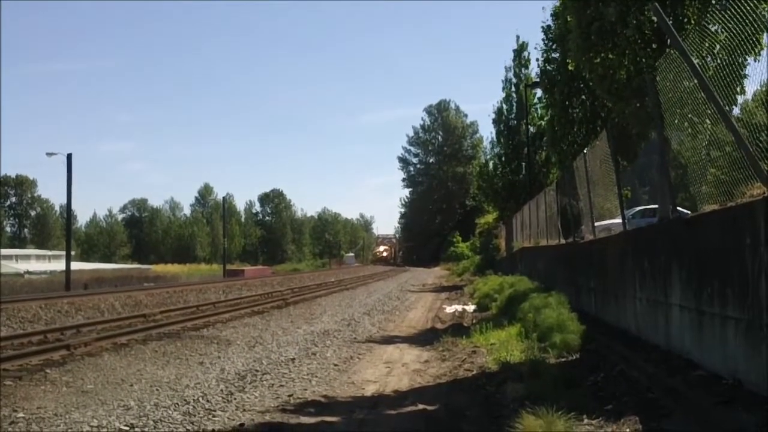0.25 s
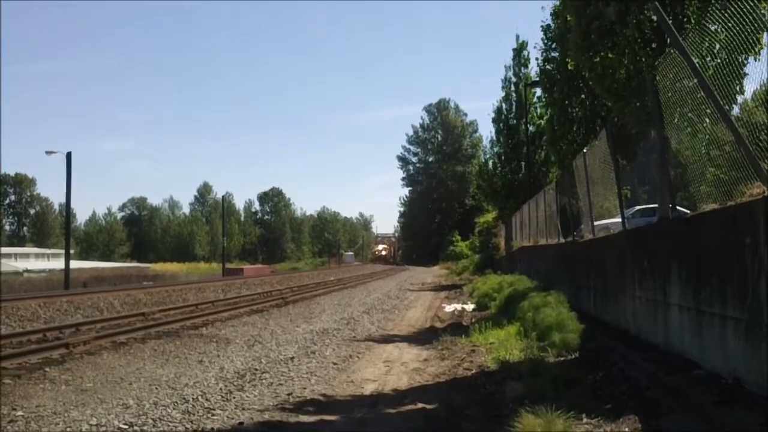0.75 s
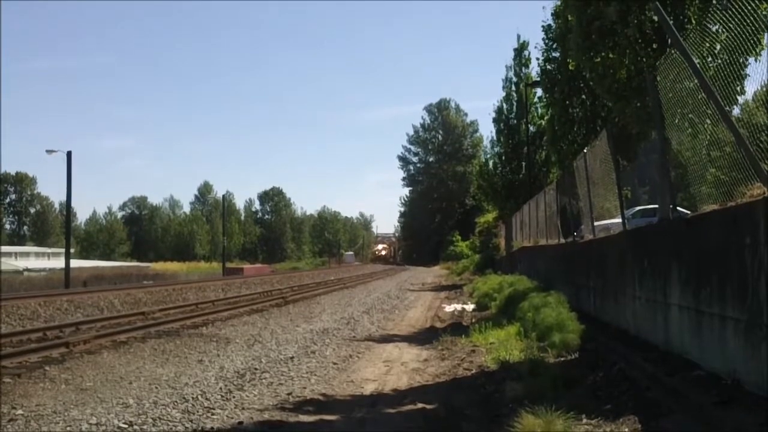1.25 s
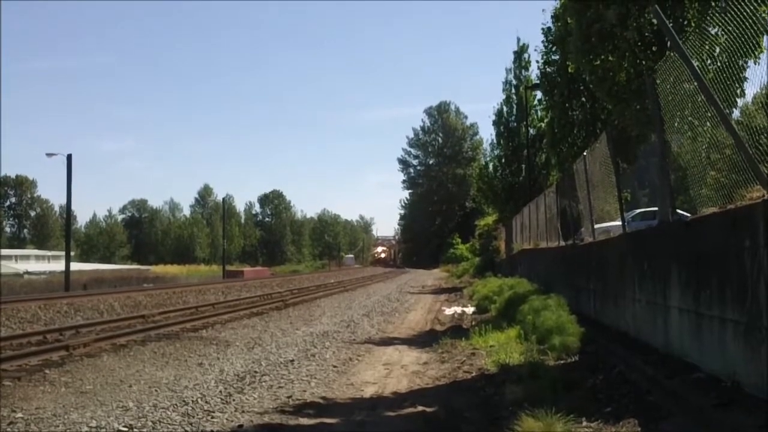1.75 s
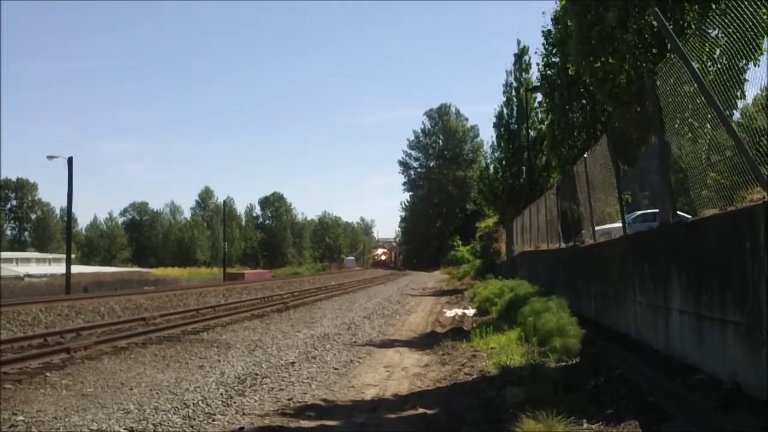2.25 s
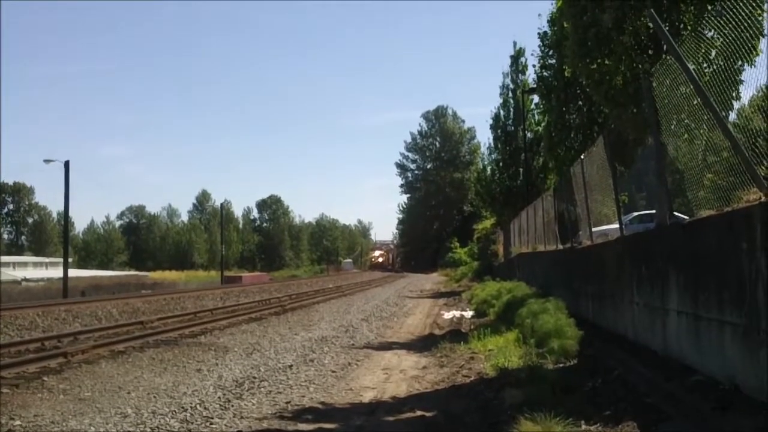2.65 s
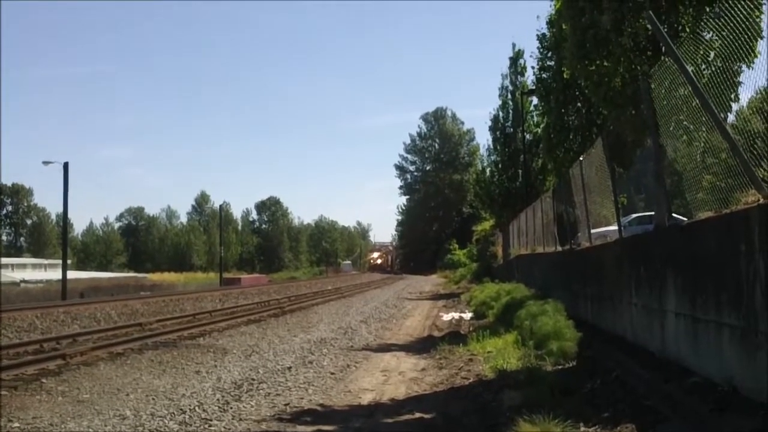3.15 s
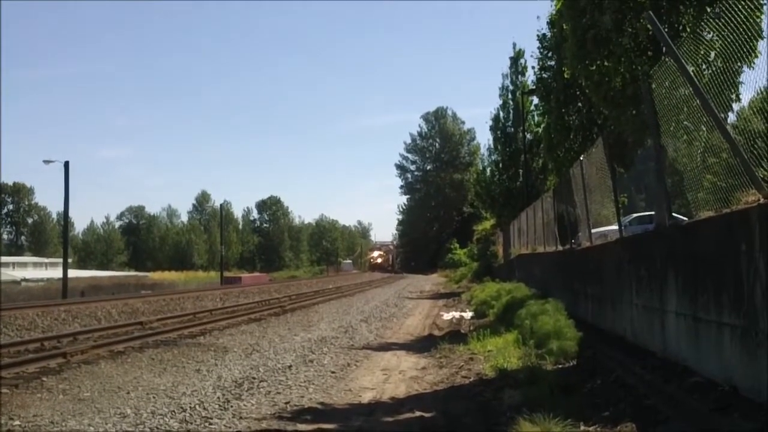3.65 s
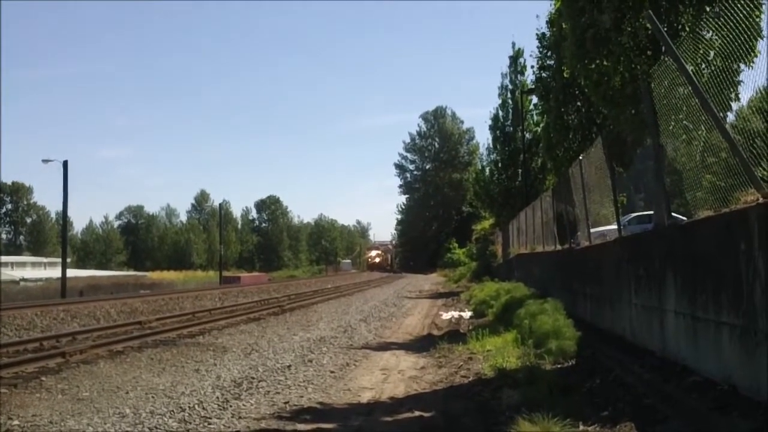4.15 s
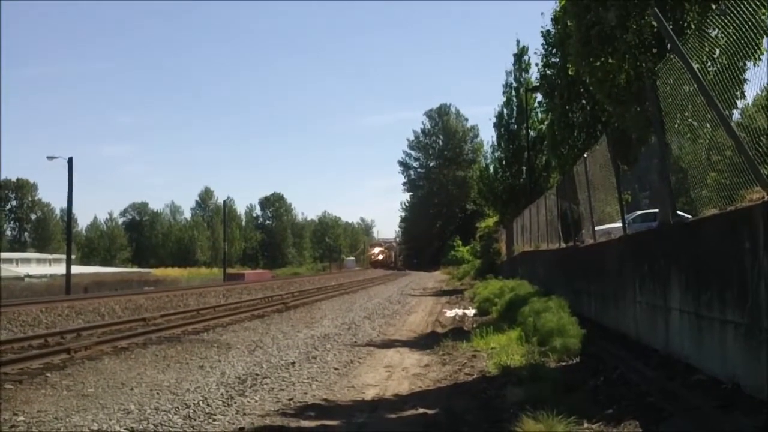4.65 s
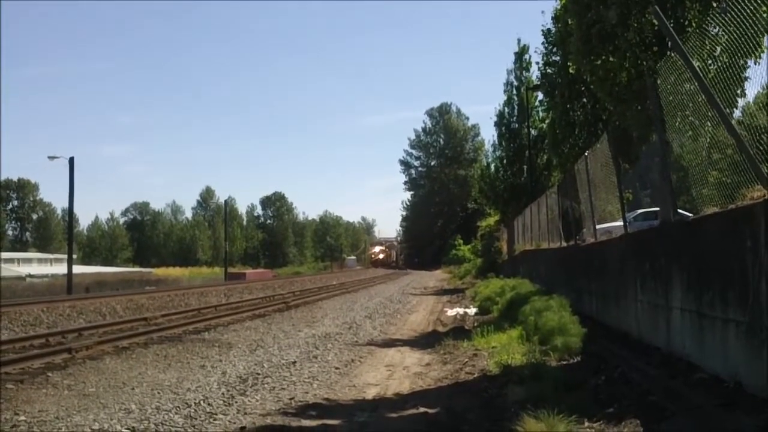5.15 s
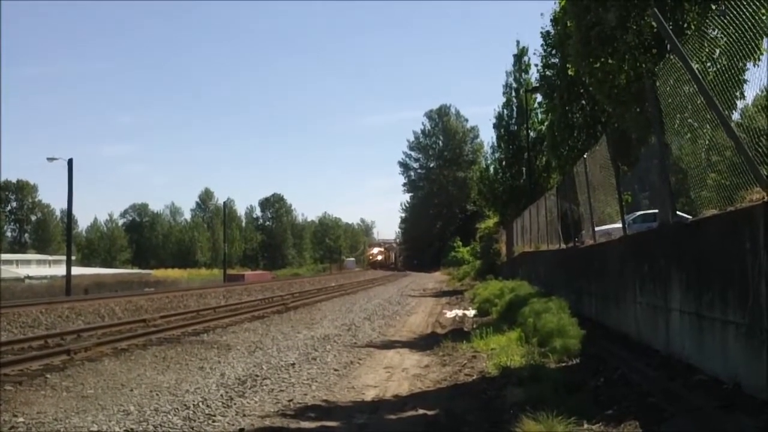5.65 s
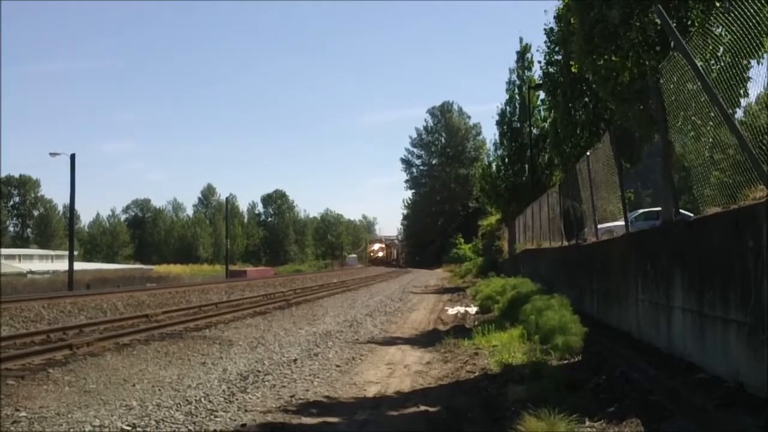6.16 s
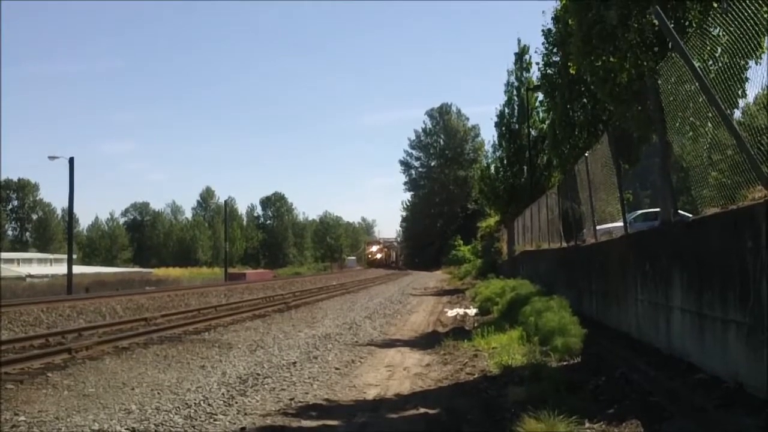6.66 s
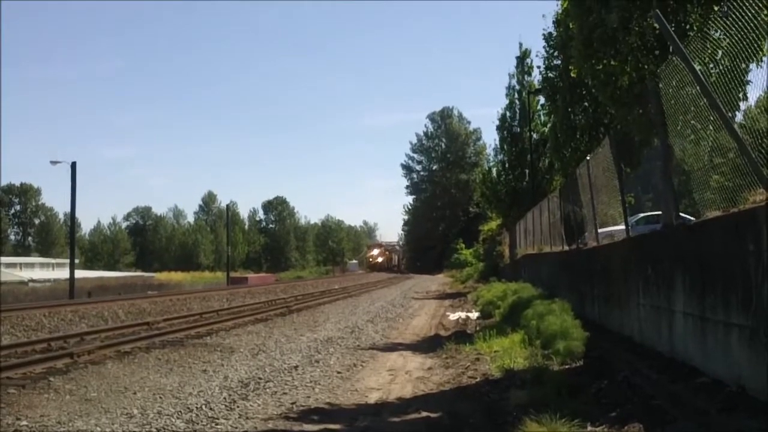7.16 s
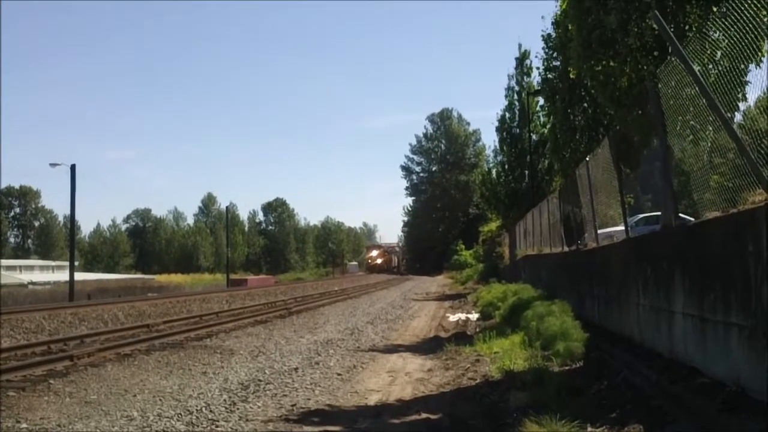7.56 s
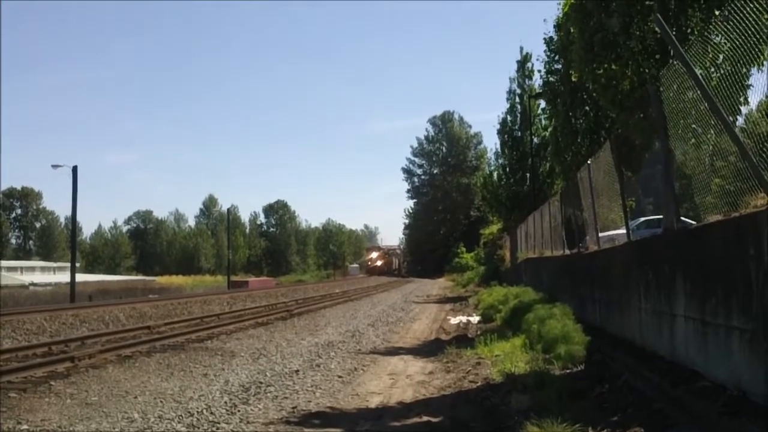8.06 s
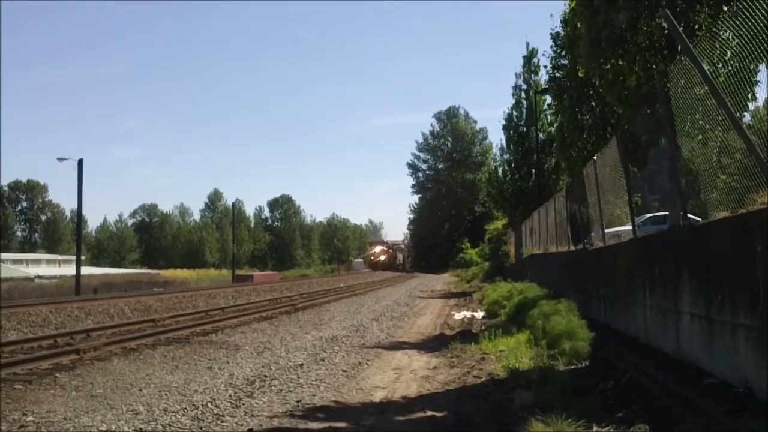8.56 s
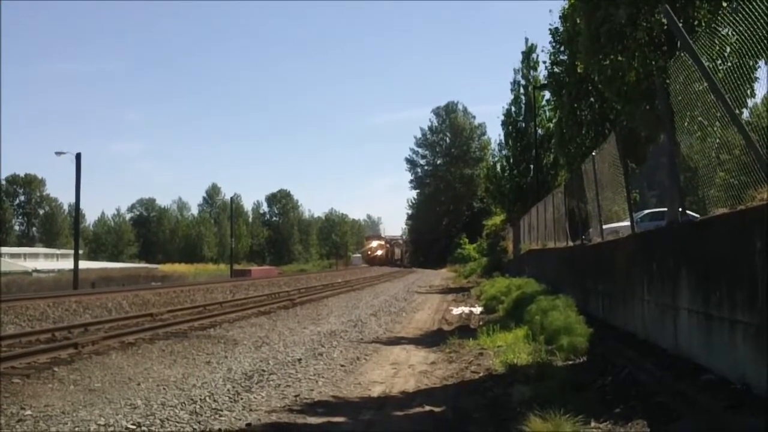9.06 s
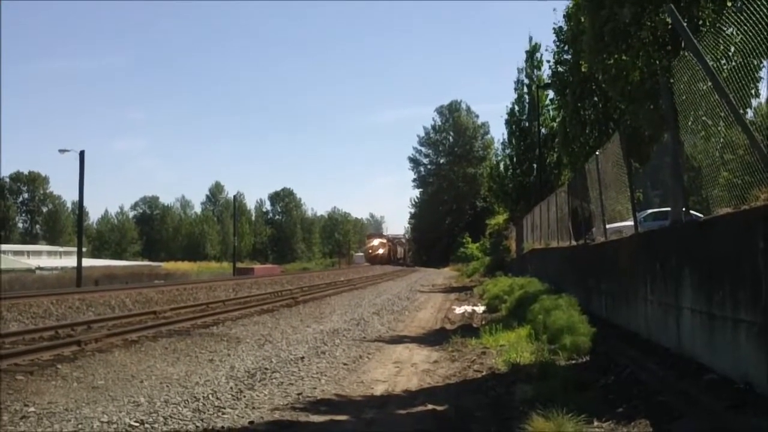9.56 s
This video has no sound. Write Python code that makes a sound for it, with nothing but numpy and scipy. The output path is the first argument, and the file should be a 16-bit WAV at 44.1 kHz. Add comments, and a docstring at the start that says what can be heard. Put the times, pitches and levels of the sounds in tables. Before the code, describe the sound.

Open trackside, train still far down the line. A deep, throbbing diesel drone climbs slowly in pitch and swells, dipping briefly near the start. A second engine hums underneath. Rushing wheel hiss grows, with thin turbo whistle midway, faint metallic ringing and sizzling rail rub later. One tiny distant chirp and soft low wind bumps strike the stereo microphone, which adds faint high electronic whine. The train never passes.

```python
"""A throbbing drone and rushing noise slowly build: a diesel freight train works up speed towards the listener.
The leading two-stroke engine is a sum of crank-order tones that rise with its revs; geared whines climb with them.
A second engine is a swept firing tone with a thin, fluttering turbocharger whistle.
Exhaust rumble, wheel roar, hiss, rail rub and wind are coloured noise; the running gear rings as blurred tones.
One short chirp sounds far off; the microphone's electronics add steady faint whines and hiss."""
import sys
import numpy as np
from scipy import signal
from scipy.fft import rfft, irfft, next_fast_len
from scipy.io import wavfile

SR = 44100
rng = np.random.default_rng(int(sys.argv[2]) if len(sys.argv) > 2 else 0)


def materialize(psi):
    """Save the field psi as 16-bit PCM at rate SR to the path in sys.argv[1].

    A 1-D psi becomes a single channel; in a 2-D psi each row is a channel.
    """
    bounded = np.clip(np.atleast_2d(psi).T, -1, 1)
    quanta = np.round(bounded * 32767).astype(np.int16)
    wavfile.write(sys.argv[1], SR, quanta)


N = 433062

# strength of each cylinder's puff in firing order: level [dB]
CYLINDERS = [0, 0, 2, .3, 0, -2.5, 0, 2, 0, -.3, 1.7, 0]
# rushing hiss: (time [s], level [dB])
HISS_LEVEL = [(0, -61.5), (.55, -58), (2, -58), (3.5, -55), (5.3, -49.5), (5.95, -48.5), (6.25, -50.5),
              (7.3, -49.5), (8.5, -47), (9.3, -50)]


def from_db(db):
    """Decibels to amplitude gain."""
    return 10 ** (np.asarray(db) / 20)


def rms_one(x):
    """Scale to rms 1."""
    return x / np.sqrt(np.mean(x ** 2) + 1e-20)


def seconds():
    """Time of every sample."""
    return np.arange(N) / SR


def in_time(rows):
    """Interpolate a two-column time curve to every sample."""
    time_s, value = np.transpose(rows)
    return np.interp(seconds(), time_s, value)


def at_hz(points, hz):
    """Read a spectrum on a log-frequency axis."""
    point_hz, value = np.transpose(points)
    return np.interp(np.log(np.maximum(hz, 1)), np.log(point_hz), value)


def angle_of(hz):
    """Running angle [rad]: the integral of a rate in cycles per second."""
    return 2 * np.pi * np.cumsum(hz) / SR


def drift(corner_hz):
    """Slow random signal of rms 1: noise at SR / 40 through two equal one-pole low-passes."""
    step, warm_up = 40, 2000
    pole = np.exp(-2 * np.pi * corner_hz * step / SR)
    noise = rng.standard_normal(N // step + warm_up + 2)
    slow = signal.lfilter([1], [1, -2 * pole, pole * pole], noise)[warm_up:]
    return np.interp(np.arange(N) / step, np.arange(len(slow)), rms_one(slow))


def narrow_noise(angle, width_hz):
    """Tone blurred to narrow noise of about rms 1: two slow random signals on its cosine and sine."""
    return drift(width_hz) * np.cos(angle) + drift(width_hz) * np.sin(angle)


def scattered(angle, width_hz):
    """Blurred tone: a direct part wandering in pitch plus independent narrow noise in each ear."""
    direct = np.sqrt(2) * np.cos(angle + angle_of(width_hz / 2 * drift(width_hz)))
    diffuse = np.array([narrow_noise(angle, width_hz) for ear in range(2)])
    return (direct + diffuse) / np.sqrt(2)


def panned(x, left_db):
    """Pan by the level of the left ear over the right."""
    return x * from_db(np.array([[1], [-1]]) * left_db / 2)


def air_noise(spectrum, left_db):
    """Coloured stereo noise: a mid of rms 1 plus a side that sets the likeness of the ears per band."""
    # (frequency [Hz], left-right likeness [0-1])
    likeness = [(20, .8), (60, 0.63), (150, 0.66), (290, 0.82), (630, .42), (1300, 0.47), (2000, 0.8),
                (4000, 0.94), (7000, 1), (14000, .6)]
    size = next_fast_len(N)
    hz = np.arange(size // 2 + 1) * SR / size
    alike = np.clip(at_hz(likeness, hz), 0, .99)
    mid, side = rfft(rng.standard_normal((2, size))) * from_db(at_hz(spectrum, hz))
    side = side * np.sqrt((1 - alike) / (1 + alike))
    mid, side = irfft([mid, side], size)[:, :N]
    return panned((mid + side * [[1], [-1]]) / np.std(mid), left_db)


def swell(centre_s, length_s):
    """Gaussian bell of height 1; length is its full width at 1/e."""
    return np.exp(-np.minimum(np.square(2 * (seconds() - centre_s) / length_s), 50))


def swells(rows, base_db):
    """Base gain plus one bell per row (time, length, level)."""
    return from_db(base_db) + sum(from_db(db) * swell(centre_s, length_s) for centre_s, length_s, db in rows)


def held(start_s, end_s, fade_s):
    """Gain that ramps up, holds and ramps down."""
    t = seconds()
    return np.clip(np.minimum(t - start_s, end_s - t) / fade_s, 0, 1)


def approach_db():
    """1 / distance gain over that at the start, for a train closing in at constant speed."""
    start_m, speed_m_per_s = 293, 13.1
    distance_m = np.maximum(start_m - speed_m_per_s * seconds(), 1)
    return 20 * np.log10(start_m / distance_m)


def crank_speed():
    """The leading engine revs up almost evenly."""
    # (time [s], crank speed [turns/s])
    crank_curve = [(0, 5.015), (0.8, 5.145), (1.5, 5.314), (4, 5.77), (9.82, 6.78)]
    return in_time(crank_curve)


def puff_timing(order, places, puff_db):
    """Phase [rad] of one crank order in a train of unequal puffs at given places in the turn."""
    return np.angle(np.sum(from_db(puff_db) * np.exp(-2j * np.pi * order * places)))


def cylinder_timing(order):
    """Phase of one crank order when all twelve cylinders add."""
    return puff_timing(order, np.arange(len(CYLINDERS)) / len(CYLINDERS), CYLINDERS)


def engine_line(angle, echo, smear_rad):
    """Engine partial, rms 1 before its echoes, phase-blurred by the long way it travels."""
    # ground and wall delay each pitch by its own amount
    angle = angle + smear_rad * (rng.uniform(-1, 1) + drift(1) / 6)
    direct, delayed = np.sin(angle), np.cos(angle)
    # shifting echoes reach the two ears differently
    side = echo * (drift(1) * direct + drift(0.86) * delayed)
    return np.sqrt(2) * direct + side * [[1], [-1]]


def exhaust_boom(crank, near_db):
    """Twelve firings a turn give the main note; orders 6 and 15 sound with it as a fast throb."""
    # main note before the fade: (time [s], level [dB])
    main_note = [(0.9, -26.5), (3, -22.5), (4.2, -22), (4.9, -16), (5.8, -13.5), (6.8, -18.5), (7.4, -17),
                 (9.82, -17.5)]
    # high note before the fade: (time [s], level [dB])
    high_note = [(0, -22.5), (3, -23), (4.3, -26), (5.3, -22), (6.2, -25.5), (7.5, -24), (8.6, -22),
                 (9.82, -25)]
    # the wall's echo makes the main note wander between the ears: (time [s], left over right [dB])
    boom_sway = [(2.4, 0), (3.25, 7), (4.35, -5.5), (5.5, 4), (6.5, 2.5), (7, -3.5), (7.8, 1.6),
                 (8.45, -2.5), (9.82, -0.5)]
    low_order, main_order, high_order = 6, 12, 15
    low_start_db, low_per_near_db = -41.5, 2.1  # low note grows faster than 1 / distance

    # main and high notes fade once, briefly
    fade = swell(centre_s=1.8, length_s=0.93)
    low_db = low_start_db + low_per_near_db * near_db
    main_db = in_time(main_note) - 26 * fade
    high_db = in_time(high_note) - 10.4 * fade

    # the high note bends slightly sharp, which hurries the throb
    bend_hz = .13 * swell(centre_s=6.9, length_s=2.2)

    def note(order, db, bend=0):
        angle = order * crank + bend + cylinder_timing(order)
        return from_db(db) * engine_line(angle, echo=.09, smear_rad=.15)

    low = note(low_order, low_db)
    main = note(main_order, main_db)
    high = note(high_order, high_db, angle_of(bend_hz))
    return panned(low + high, left_db=2.0) + panned(main, in_time(boom_sway))


def exhaust_chug(crank, speed):
    """Weaker orders sweep the stack's resonances, phased to pile up into the loudest cylinders' puffs."""
    # orders added by unequal cylinders: (crank order, relative level [dB])
    uneven = [(9, 2), (11, -9), (13, -1), (14, 0), (16, -1), (17, 1), (18, 8), (19, -4), (20, 3), (21, 6),
              (22, -3), (23, 1), (24, 3), (25, 2), (26, 4), (27, 4), (28, 1), (29, -9), (30, -1), (31, -2),
              (32, 2), (33, 7), (34, 6), (35, -3), (36, 7), (37, 2), (38, -3), (39, 6), (40, 1), (41, 3),
              (42, 2), (43, 0), (44, 0), (45, 3), (46, 2), (47, -1), (48, 0), (49, -1), (50, 1), (51, 1),
              (52, 4), (53, -2), (54, -1), (55, 0), (56, -6), (57, -4), (58, 1), (59, 1), (61, -1), (63, 0),
              (64, 1)]
    # response of exhaust stack and ground: (frequency [Hz], gain [dB])
    stack = [(46, -54), (60, -38), (72, -23.5), (88, -35.5), (110, -47), (130, -42), (165, -45),
             (198, -45.5), (222, -60), (250, -64.5), (335, -66.5), (400, -77.5)]
    # cylinders that bark: (place in firing order, early level [dB], late level [dB])
    loud_puffs = [(2, 0, -8), (4, -6, -6), (5, -2, 0), (7, -3, -9), (10, -6, -9)]
    # distance smears higher orders more: (crank order, smear [rad])
    order_smear = [(14, 1.4), (24, 2.4)]
    # chug strength: (time [s], gain [dB])
    chug_gain = [(0, -9), (2.5, -2.5), (5.2, 0), (9.82, 2.5)]
    first_puff_turn = .016  # fraction of a turn
    pattern_shift_s = 6.3, 8.3  # early puff pattern gives way to late

    cylinder, early_db, late_db = np.transpose(loud_puffs)
    places = first_puff_turn + cylinder / len(CYLINDERS)
    out = 0
    for order, db in uneven:
        timings = np.unwrap([puff_timing(order, places, puff_db) for puff_db in (early_db, late_db)])
        timing = np.interp(seconds(), pattern_shift_s, timings)
        smear_rad = np.interp(order, *np.transpose(order_smear))
        line = engine_line(order * crank + timing, echo=.15, smear_rad=smear_rad)
        out = out + from_db(db + at_hz(stack, order * speed)) * line
    return from_db(in_time(chug_gain)) * out


def gears(crank):
    """Fans and gears geared to the crank: blurred whines that climb with it."""
    # (crank order, width [Hz], level before the common gain [dB])
    gear_lines = [(78, 8, -65), (101, 5, -63), (141.5, 9, -59), (283, 30, -64)]
    # common gain: (time [s], gain [dB])
    gear_gain = [(0, -11), (2.6, -3.5), (3.1, -7), (3.6, -2.5), (4.3, -4), (6.5, -5.5), (7.6, -5.5),
                 (8.6, 6.5), (9.15, 0), (9.8, -2)]
    whines = sum(from_db(db) * scattered(order * crank, width_hz) for order, width_hz, db in gear_lines)
    return from_db(in_time(gear_gain)) * whines


def second_engine(waver_db, turbo_flutter_db):
    """Low firing note on an S-curve between throttle notches, plus a fluttering turbocharger whistle."""
    # firing note before its waver: (time [s], level [dB])
    firing_level = [(0.8, -24), (1.5, -31.5), (2.5, -23.5), (3.5, -34.5), (4.7, -26), (5.6, -28.5),
                    (7.4, -35.5), (8.7, -25)]
    # turbocharger spooling up: (time [s], pitch [Hz])
    turbo_pitch = [(3.5, 4180), (3.87, 4305), (4.18, 4395), (4.7, 4480), (5, 4522), (5.45, 4562),
                   (6.7, 4655), (9.3, 4685)]
    # whistle flares, added to the resting level: (start [s], end [s], level [dB])
    turbo_flares = [(3.81, 3.91, -68), (3.99, 4.07, -65), (4.09, 4.23, -65), (4.59, 4.74, -61),
                    (4.94, 5.1, -62), (5.18, 5.36, -56), (5.37, 5.5, -62), (9.15, 9.8, -69)]
    turbo_rest_db = -81
    notch_from_hz, notch_to_hz, notch_middle_s, notch_ease_s = 49.7, 66.133, 3.096, .988

    revved = 1 / (1 + np.exp((notch_middle_s - seconds()) / notch_ease_s))
    firing = angle_of(notch_from_hz + (notch_to_hz - notch_from_hz) * revved)
    drone = from_db(in_time(firing_level) + waver_db * drift(7.4)) * np.sin(firing)

    flares = sum(from_db(db) * held(start_s, end_s, fade_s=.025) for start_s, end_s, db in turbo_flares)
    turbo_gain = (from_db(turbo_rest_db) + flares) * from_db(turbo_flutter_db * drift(13))
    whistle = turbo_gain * np.sin(angle_of(in_time(turbo_pitch)) + 0.54 * drift(30))
    return np.sqrt(2) * (drone + whistle)


def exhaust_rumble(crank, near_db, chug_depth):
    """Turbulent exhaust: low noise pulsed 4 and 12 times a turn, growing as 1 / distance."""
    # (frequency [Hz], relative density [dB])
    rumble_spectrum = [(25, -18.5), (50, 6), (72, 14), (95, 9), (120, -1.5), (160, 1), (195, 4),
                       (230, -7.5), (330, -7), (420, -15.5), (600, -49.5), (1500, -72)]
    start_db = -37.5
    clear_db = 2.4 * swell(centre_s=8.63, length_s=1.1)  # carries best for a moment
    puffs = 1 + chug_depth * (np.cos(4 * crank) + np.cos(12 * crank))
    return from_db(start_db + near_db + clear_db) * puffs * air_noise(rumble_spectrum, left_db=3.0)


def hiss_swing_db():
    """Hiss level about its mean."""
    hiss_db = in_time(HISS_LEVEL)
    return hiss_db - hiss_db.mean()


def wheel_roar(flicker_db):
    """Flickering mid-band noise of the wheels that follows a third of the hiss's swing."""
    # (frequency [Hz], relative density [dB])
    roar_spectrum = [(200, -18.5), (400, -1.5), (520, 1.5), (660, 3.5), (800, 1), (1200, -1), (1550, -5),
                     (1800, -3), (2300, -12), (3200, -11.5), (5000, -33), (9000, -57)]
    mean_db, hiss_share = -49.5, 0.33
    roar_db = mean_db + hiss_share * hiss_swing_db() + flicker_db * drift(7.6)
    return from_db(roar_db) * air_noise(roar_spectrum, left_db=0)


def rushing_hiss(crank, flicker_db):
    """Noise that swells once a turn; air swallows its top at a distance, so that swings more."""
    # (frequency [Hz], relative density [dB])
    hiss_spectrum = [(600, -30.5), (1300, 1.5), (1560, -1.5), (1780, 3.5), (2120, 2), (2400, 2.5),
                     (2750, 0.5), (3150, .5), (3550, 3.5), (4100, 0), (4700, 0.5), (5700, -7.5),
                     (7000, -13), (8000, -19.5), (9500, -36), (12000, -49.5)]
    # top band: (frequency [Hz], relative density [dB])
    top_spectrum = [(4000, -24.5), (5500, 0.5), (7000, -6), (8000, -9.5), (9500, -29.5), (12000, -44.5)]
    # swell in each crank turn: (time [s], amplitude [dB])
    hiss_pulse = [(2.5, .5), (4.6, 1.25), (7, 0.8), (9, .4)]
    top_mean_db, top_swing_ratio = -69, 1.5
    swell_db = in_time(hiss_pulse) * np.cos(crank) + flicker_db * drift(18)
    hiss = from_db(in_time(HISS_LEVEL)) * air_noise(hiss_spectrum, left_db=-.5)
    top_db = top_mean_db + top_swing_ratio * hiss_swing_db()
    top = from_db(top_db) * air_noise(top_spectrum, left_db=1)
    return from_db(swell_db) * (hiss + top)


def wheel_rub():
    """Wheels rubbing on the rails: a coloured sizzle that swells over a resting level."""
    # (frequency [Hz], relative density [dB])
    rub_spectrum = [(1200, -28.5), (1750, -7.5), (2050, 1.5), (2270, -3), (2500, 1), (2750, -7), (2970, 3),
                    (3250, -14.5), (4700, -9), (5700, -13), (6500, -22.5), (7200, -10.5), (8500, -37)]
    # swells: (time [s], length [s], added level [dB])
    rub_swells = [(.9, 0.81, -77), (2.55, 0.51, -62), (7.65, .6, -59.5), (8.65, .4, -57), (9.5, 0.57, -54)]
    return swells(rub_swells, base_db=-72) * air_noise(rub_spectrum, left_db=-1.5)


def running_gear_rings(fade_s):
    """Resonances of the running gear: steady-pitched blurred tones that come and go."""
    # (start [s], end [s], frequency [Hz], width [Hz], level [dB])
    ring_lines = [(4.9, 9.6, 649, 7, -62.5), (6.8, 9.6, 668, 3, -64), (6.5, 10.2, 1171, 2, -62.5),
                  (4.5, 6.1, 1830, 60, -63), (.1, 2.2, 1199, 4, -68), (2.8, 5.6, 1173, 6, -67),
                  (.3, 4.6, 988, 12, -68), (4.6, 10.2, 977, 3, -68.5), (2.1, 5.9, 1715, 25, -66.5),
                  (-.2, 1.3, 325, 8, -57), (8.4, 9.2, 391, 3, -56), (8.4, 9.5, 521, 4, -62)]
    t = seconds()
    return sum(from_db(db) * held(start_s, end_s, fade_s) * scattered(2 * np.pi * hz * t, width_hz)
               for start_s, end_s, hz, width_hz, db in ring_lines)


def wind():
    """Gusts over a light breeze buffet each microphone port with independent noise, mostly the left."""
    # (frequency [Hz], relative density [dB])
    buffet_spectrum = [(4, -24), (10, -2), (25, -1.5), (40, 0), (70, -17.5), (150, -31), (400, -57),
                       (1500, -92)]
    # gusts: (time [s], length [s], added level [dB])
    gusts = [(.66, 0.11, -35), (2.83, 0.092, -25), (3.24, 0.21, -25), (3.64, 0.18, -34), (5.93, 0.24, -31),
             (6.43, 0.15, -34), (6.8, .14, -38), (7.26, .12, -34), (7.63, 0.17, -28)]
    ports = np.array([air_noise(buffet_spectrum, left_db=5.5)[ear] for ear in range(2)])
    return swells(gusts, base_db=-47) * ports


def electronics():
    """Fixed sine whines, some amplitude-modulated and stronger on the right, over faint hiss."""
    # (frequency [Hz], level [dB], flutter depth at each rate [0-1])
    whine_lines = [(3466.7, -74.5, .3), (4000, -71.7, 0), (5200, -74, .3), (6000, -78.5, 0),
                   (6933.3, -75, .3), (8000, -81, 0), (8666.7, -74.5, .3), (10000, -81, 0),
                   (10400, -76, .3), (12133.3, -76, .3), (13866.7, -76.5, .3), (15000, -74.5, 0)]
    # hiss: (frequency [Hz], relative density [dB])
    self_noise = [(100, -9), (5000, 1), (9500, 2), (12500, -2.5), (15000, 0.5)]
    t = seconds()
    flutter = sum(np.cos(2 * np.pi * hz * t) for hz in (50, 58.3))
    whine = np.sqrt(2) * sum(from_db(db) * (1 + depth * flutter) * np.sin(2 * np.pi * hz * t)
                             for hz, db, depth in whine_lines)
    return panned(whine, left_db=-9.5) + from_db(-67.0) * air_noise(self_noise, left_db=4.0)


def chirp():
    """One brief, rough, far chirp: narrow noise with a linear attack and exponential decay."""
    start_s, attack_s, decay_s, pitch_hz, level_db = 2.515, .012, .04, 4620, -55.5
    t = seconds() - start_s
    shape = np.clip(t / attack_s, 0, 1) * np.exp(-np.maximum(t - attack_s, 0) / decay_s)
    return from_db(level_db) * shape * narrow_noise(2 * np.pi * pitch_hz * t, width_hz=190)


def scene():
    """The crank drives the leading engine; nearness lifts its low note and rumble."""
    speed, near_db = crank_speed(), approach_db()
    crank = angle_of(speed)
    lead = exhaust_boom(crank, near_db) + exhaust_chug(crank, speed) + gears(crank)
    second = second_engine(waver_db=1.6, turbo_flutter_db=2)
    rumble = exhaust_rumble(crank, near_db, chug_depth=0.31)
    rushing = wheel_roar(flicker_db=0.77) + rushing_hiss(crank, flicker_db=1.0)
    wheels = wheel_rub() + running_gear_rings(fade_s=0.22)
    return lead + second + rumble + rushing + wheels + wind() + electronics() + chirp()


def record(dry):
    """Steep elliptic low-pass: .1 dB ripple, 90 dB stopband."""
    cutoff_hz = 15250
    return signal.sosfilt(signal.ellip(12, .1, 90, cutoff_hz, fs=SR, output="sos"), dry)


dry = scene()
out = record(dry)
materialize(out)
```